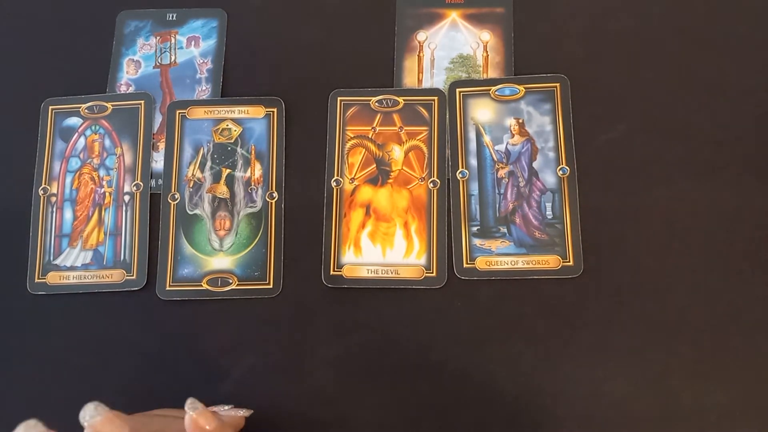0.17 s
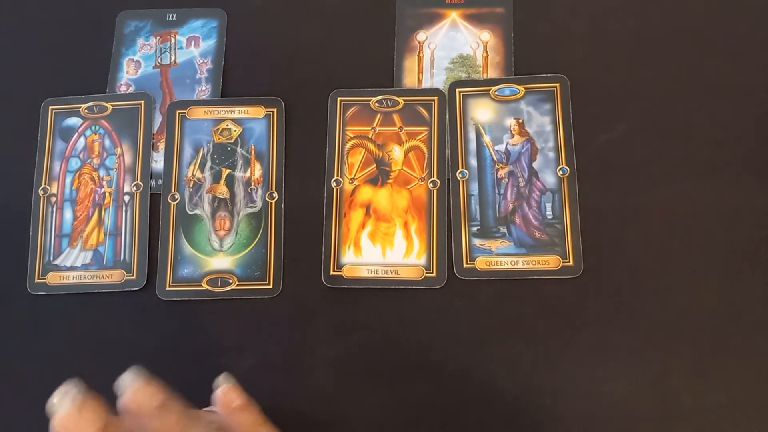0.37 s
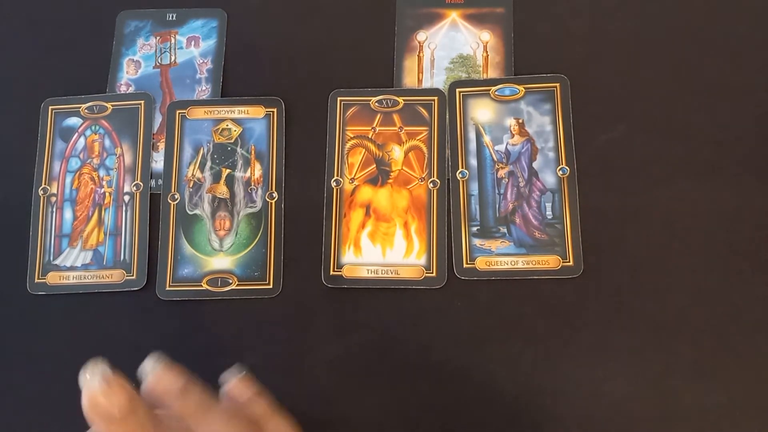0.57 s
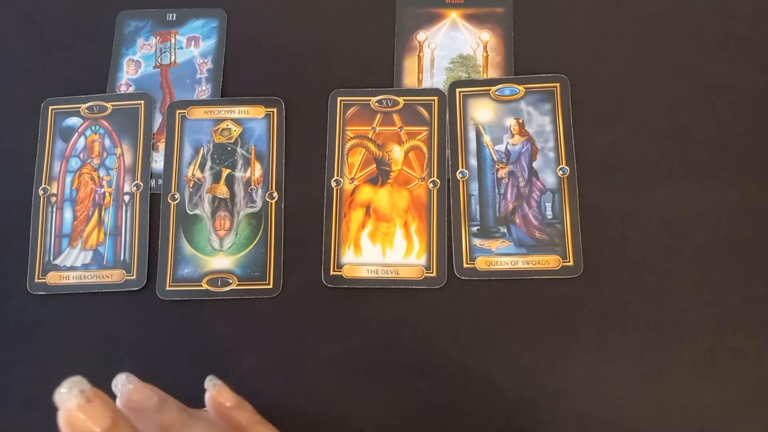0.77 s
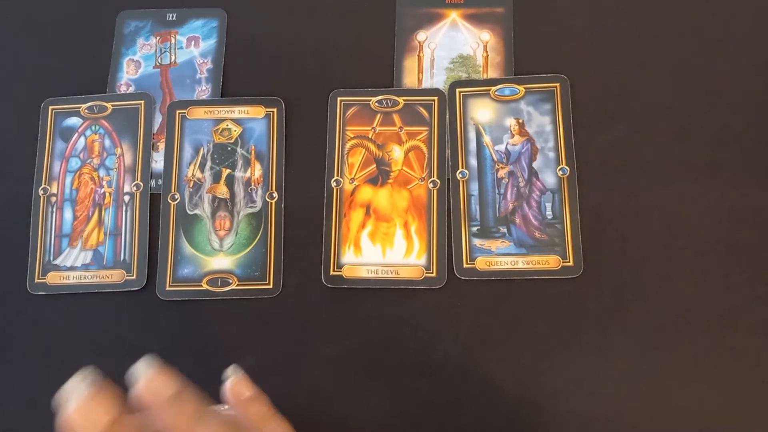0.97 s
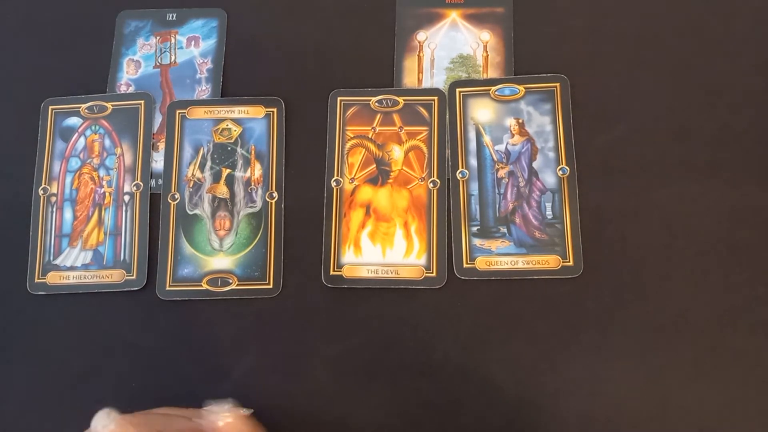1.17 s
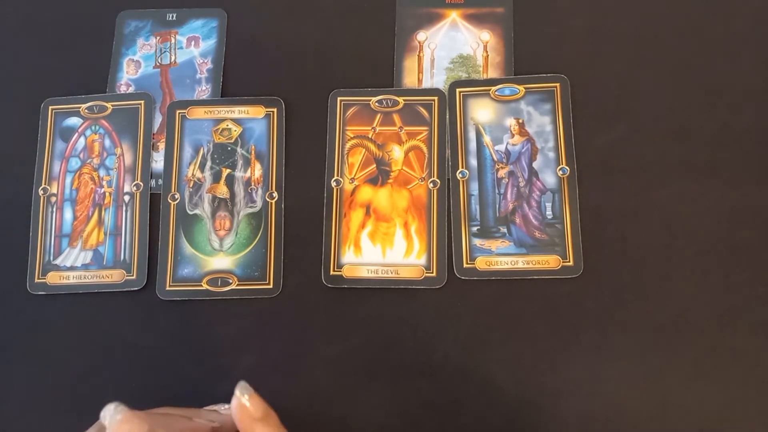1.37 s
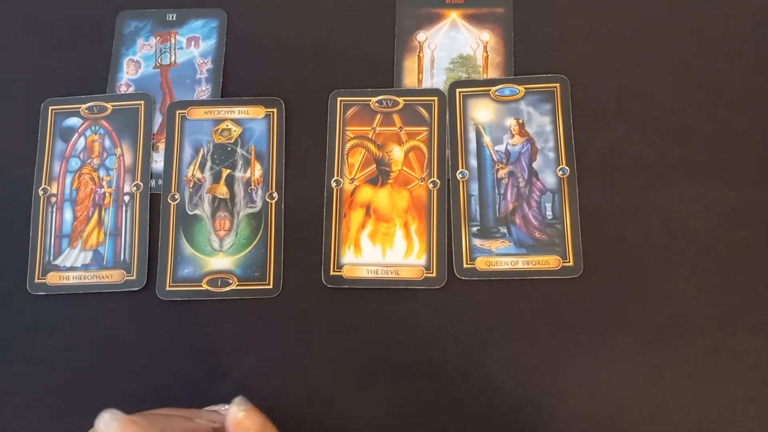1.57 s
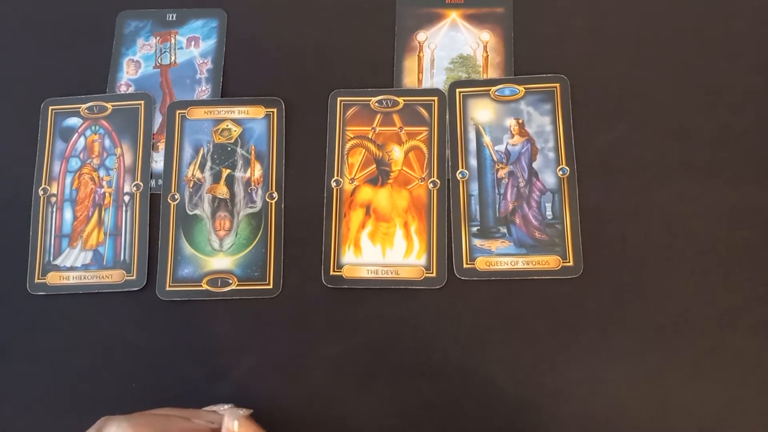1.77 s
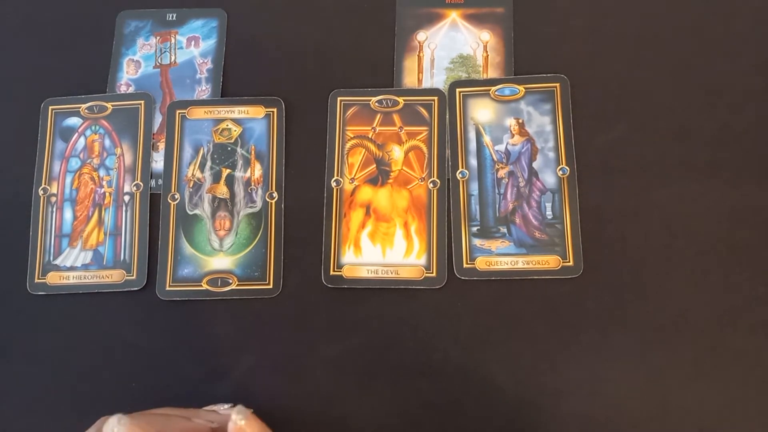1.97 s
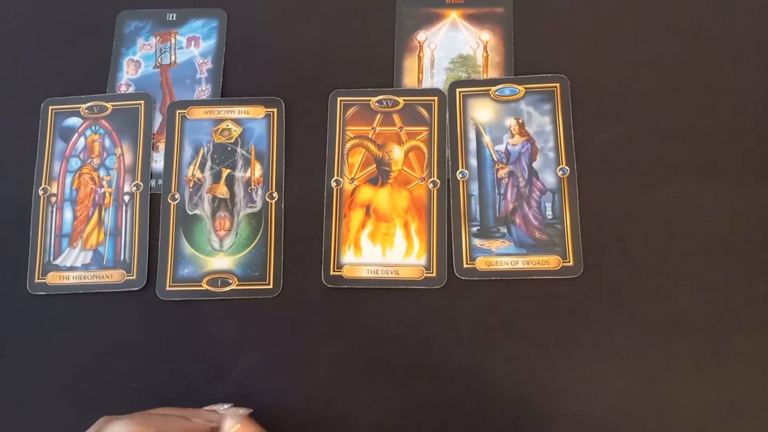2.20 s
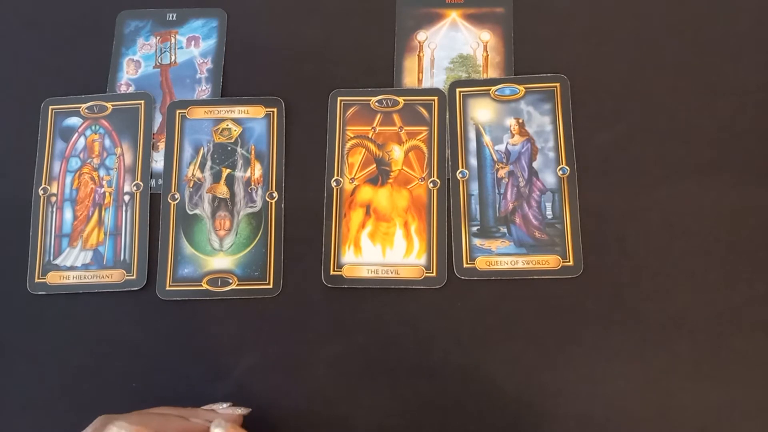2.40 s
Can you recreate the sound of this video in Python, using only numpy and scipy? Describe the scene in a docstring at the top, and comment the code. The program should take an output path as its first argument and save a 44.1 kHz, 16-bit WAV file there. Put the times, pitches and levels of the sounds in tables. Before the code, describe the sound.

Fingertips tap softly on a table, each a dull knock with a brief low boom, a faint nail tick and a short room echo. Five taps fall about 0.3 seconds apart until 1.2 seconds, then seven quicker, uneven ones follow until 2.4 seconds. The hand bumps lightly near 0.4, 1.4 and 2 seconds. Underneath, a faint hiss and soft rush grow slightly over quiet room tone.

```python
"""Fingertips tap softly and unevenly on a table in a small quiet room. Each finger pad lands with a dull knock
and sets off a brief low boom; the nail adds a faint, grazing tick, and the room answers with a short tail. The
hand bumps down lightly between taps. Underneath, a soft rush swells over the room tone and a faint hiss rises
and eases."""
import sys
import numpy as np
from scipy import signal
from scipy.fft import rfft, irfft
from scipy.io import wavfile

SR = 44100
rng = np.random.default_rng(int(sys.argv[2]) if len(sys.argv) > 2 else 0)


def dump(signal):
    """Clip the signal to [-1, 1] and save it as 16-bit WAV at the path in sys.argv[1]."""
    limited = np.clip(np.atleast_2d(signal).T, -1, 1)
    pcm = np.round(limited * 32767).astype(np.int16)
    wavfile.write(sys.argv[1], SR, pcm)


N = 107515

# Finger taps: t/s, thump level/dB, boom trim/dB, upper-mode and knock trim/dB, ring time factor,
# tick level/dB, nail resonance f/Hz, its boost/dB, tick tilt/(dB per octave)
TAP_CUES = [(0.0135, -3, -1.5, -0.5, 0.72, -2, 3600, 3, 1.9),
            (0.3144, -0.5, -1.5, 0, 0.71, -2.5, 3900, 7.1, 0.52),
            (0.6197, 0, -1.5, 0, 0.84, 0, 4850, 7.7, 2.9),
            (0.926, -1.5, 2.5, 1.5, 0.56, -2.5, 4100, 8.3, 1.4),
            (1.2395, 1.5, -1.5, 1.5, 0.83, -2.5, 6950, 5.9, -0.72),
            (1.4288, -1, -3, -5.5, 0.92, -1, 6600, 5.1, 0.14),
            (1.6201, -7.5, -1.5, -3, 1.08, -11.5, 7400, 4.2, 1.5),
            (1.7792, -0.5, -5.5, -0.5, 0.36, -0.5, 6940, 3, 0.54),
            (1.9145, -5, -3.5, -4, 0.82, -13.5, 7300, 2.7, -0.64),
            (2.1041, -4.5, -2, -1, 0.95, -2, 4400, 4.6, 1.5),
            (2.266, -7.5, -9.5, -9, 0.9, -12.5, 8360, 1.8, 0.29),
            (2.4111, -1, -2, -5.5, 1.1, -8, 4360, 8, 1.7)]
# Low modes that ring after each tap: f/Hz, level/dB, attack/s, hold/s, t60/s
LOW_MODES = [(69.95, -36.5, 0.032, 0.04, 0.19), (140.7, -32.5, 0.011, .003, 0.056),
             (124.1, -50.5, 0.05, 0.035, 0.35), (160.3, -37, .011, 0.0026, 0.07),
             (178.8, -42.5, 0.013, .004, 0.4), (197.2, -46.5, 0.039, 0.0047, .2),
             (221.3, -50.5, .025, 0.0089, .2), (257.1, -45.5, 0.019, 0.027, 0.23),
             (284.8, -49.5, 0.011, 0.0079, 0.26), (334.4, -47, .022, 0.044, 0.18),
             (397, -51, 0.0021, .004, 0.22)]
# Dull colour of the finger pad's knock: f/Hz, level/dB
PAD_EQ = [(30, -56), (100, -9), (200, 11.5), (380, -5), (520, -9.5), (700, -19), (1300, -26), (2200, -44.5),
          (4000, -56), (16000, -76.5)]
# Bright colour of the nail's tick: f/Hz, level/dB
NAIL_EQ = [(100, -27), (600, -18.5), (1400, -2), (2200, -6), (3100, -9), (5500, -8.5), (7000, -3),
           (8300, -4.5), (9900, -11), (11400, -7), (13500, -8), (16000, -11.5)]
# Stereo lean of the tick: f/Hz, left minus right level/dB
NAIL_LEAN = [(2000, -5), (5500, -0.5), (8500, 14), (11000, 5), (15000, 3)]
# Decay of the room: f/Hz, t60/s
ROOM_DECAY = [(60, 0.59), (150, 0.48), (350, 0.64), (700, 1), (2000, 0.61), (5000, 0.38), (15000, 0.21)]
# Left-right likeness of diffuse sound: f/Hz, correlation (0-1)
STEREO_LIKENESS = [(50, 0.69), (300, 0.84), (600, 0.38), (1200, 0), (16000, 0)]
# Soft bumps of the hand: t/s, level/dB, f/Hz, length/s
BUMP_CUES = [(0.189, -53, 89, 0.085), (0.364, -40.5, 77.3, .11), (1.355, -46, 91.3, 0.11),
             (1.963, -39.5, 73.4, 0.074), (2.177, -37, 85.2, 0.093), (2.281, -50, 114, 0.079)]
# Colours of the room tone, the hiss and the rush: f/Hz, relative level/dB
ROOM_TONE_EQ = [(20, -7.5), (40, -31), (65, -3.5), (100, 3), (150, -4), (250, -16), (340, -9.5),
                (520, -29.5), (800, -32.5), (1300, -47.5), (2400, -35), (3300, -47.5), (7000, -47.5),
                (16000, -45.5)]
HISS_EQ = [(500, 6.5), (1000, 7.5), (2400, 4), (3300, -2.5), (5500, -5), (6500, 0.5), (7600, 0.5),
           (9000, -14.5), (16000, -4.5)]
RUSH_EQ = [(100, -24.5), (300, 11.5), (550, 4.5), (1150, 1), (1450, -15.5), (2500, -58.5), (5000, -38)]
# Fader rides of the hiss and the rush: t/s, level/dB
HISS_RIDE = [(0, -83), (.7, -80.5), (1.1, -77.5), (1.45, -73.5), (1.75, -74.5), (2.05, -74), (2.4, -77)]
RUSH_RIDE = [(0, -94), (.9, -81), (1.4, -73.5), (1.9, -65.5), (2.15, -65.5), (2.4, -59.5)]


def amp(db):
    """Decibels to gain."""
    return 10 ** (np.asarray(db) / 20)


def curve_at(points, hz):
    """Reads a curve on a log-frequency axis."""
    f, value = np.transpose(points)
    return np.interp(np.log(hz + 1), np.log(f + 1), value)


def add(mix, start_s, sound):
    """Lays a sound into the mix."""
    part = mix[..., round(start_s * SR):][..., :sound.shape[-1]]
    part += sound[..., :part.shape[-1]]


def fade(t, t60):
    """Exponential decay, 60 dB down at t60."""
    return np.exp(-np.log(1000) * t / t60)


def diffuse(spectra, hz):
    """Blends two unrelated spectra: narrow in the bass, wide in the treble."""
    likeness = curve_at(STEREO_LIKENESS, hz)
    left, other = spectra
    return np.array([left, likeness * left + np.sqrt(1 - likeness ** 2) * other])


def pulse(colour_db):
    """The tightest (minimum-phase) click with the given dB per frequency bin."""
    mirrored_db = np.r_[colour_db, colour_db[-2:0:-1]]
    log_gain = np.log(amp(np.clip(mirrored_db, -100, 40)))
    return np.fft.ifft(np.exp(np.conj(signal.hilbert(log_gain)))).real


def from_right(x, lean_db=3, lag_s=0.00027):
    """Places a sound to the right: it reaches the left later and weaker."""
    at = np.arange(len(x))
    delayed = np.interp(at - lag_s * SR, at, x)
    return np.array([amp(-lean_db / 2) * delayed, amp(lean_db / 2) * x])


def pad_knock(gain_db=-11, size=4096):
    """The soft pad lands: one dull pulse."""
    return amp(gain_db) * pulse(curve_at(PAD_EQ, np.fft.rfftfreq(size, 1 / SR)))


def low_thump(boom_db, upper_db, ring, scatter_db=1.23, detune=0.004):
    """The low modes swell, hold and die; no two taps strike quite the same spot."""
    t, out = np.arange(SR // 2) / SR, 0
    for hz, db, attack, hold, t60 in LOW_MODES:
        level_draw, pitch_draw = rng.standard_normal(2)
        swell = np.sin(np.pi / 2 * np.minimum(t / attack, 1)) ** 2
        decay = fade(np.maximum(t - attack - hold, 0), t60 * np.clip(ring, 0.5, 2))
        trim_db = boom_db * (hz < 100) + upper_db * (hz > 220)
        gain = amp(db + trim_db + scatter_db * level_draw)
        tone = np.sin(2 * np.pi * hz * (1 + detune * pitch_draw) * t)
        out = out - gain * swell * decay * tone
    return out


def nail_tick(peak_hz, peak_db, tilt_db, gain_db=-34.5, width_oct=0.2, size=1024):
    """The nail's click with one broad resonance; its high treble leans left."""
    hz = np.fft.rfftfreq(size, 1 / SR)
    octaves = np.log2((hz + 1) / peak_hz)
    resonance = peak_db * np.exp(-(octaves / width_oct) ** 2)
    colour = curve_at(NAIL_EQ, hz) + resonance + tilt_db * np.maximum(octaves, -2)
    lean = curve_at(NAIL_LEAN, hz) / 2
    return amp(gain_db) * np.array([pulse(colour + lean), pulse(colour - lean)])


def nail_graze(tick, grain_db=3.5, t60=0.023):
    """The nail grazes the surface as it lands: the tick plus a few milliseconds of grain."""
    t = np.arange(SR // 20) / SR
    grain = rng.standard_normal((2, len(t))) * fade(t, t60)
    grain *= amp(grain_db) / np.linalg.norm(grain[0])
    return signal.fftconvolve(tick, grain + signal.unit_impulse(len(t)), axes=1)


def room_reverb(send):
    """The room's diffuse tail, hanging longest in the mids."""
    hz, t, spectra = signal.stft(rng.standard_normal((2, SR // 2)), SR, nperseg=256)
    decay = fade(t, curve_at(ROOM_DECAY, hz)[:, None])
    _, tail = signal.istft(diffuse(spectra, hz[:, None]) * decay, SR, nperseg=256)
    return signal.fftconvolve(send, tail / np.linalg.norm(tail[0]), axes=1)


def finger_taps(thump_send_db=-13.5, knock_send_db=4.5, tick_send_db=7, nail_lag_s=0.00086):
    """Every tap layers a knock, a thump and a tick, each with its own reverb send."""
    out = np.zeros((2, N))
    pad = from_right(pad_knock())
    for start_s, thump_db, boom_db, upper_db, ring, tick_db, peak_hz, peak_db, tilt_db in TAP_CUES:
        knock = amp(thump_db + upper_db) * pad
        thump = amp(thump_db) * from_right(low_thump(boom_db, upper_db, ring))
        tick = amp(tick_db) * nail_tick(peak_hz, peak_db, tilt_db)
        send = amp(thump_send_db) * thump
        add(send, 0, amp(knock_send_db) * knock)
        add(send, 0, amp(tick_send_db) * tick.mean(0))
        for layer in (knock, thump, room_reverb(send)):
            add(out, start_s, layer)
        add(out, start_s + nail_lag_s, nail_graze(tick))
    return out


def noise_bed(eq):
    """Steady, diffuse noise at unit rms, coloured by an EQ curve."""
    hz = np.fft.rfftfreq(N, 1 / SR)
    white = rfft(rng.standard_normal((2, N)))
    bed = irfft(diffuse(white, hz) * amp(curve_at(eq, hz)), N)
    return bed / bed.std()


def ambience(room_tone_db=-60.5):
    """Steady room tone, a soft rush that grows, and a faint hiss that rises and eases."""
    t = np.arange(N) / SR
    rush = amp(np.interp(t, *np.transpose(RUSH_RIDE))) * noise_bed(RUSH_EQ)
    hiss = amp(np.interp(t, *np.transpose(HISS_RIDE))) * noise_bed(HISS_EQ)
    return amp(room_tone_db) * noise_bed(ROOM_TONE_EQ) + rush + hiss


def hand_bumps():
    """The flesh of the hand pushes the table: a low swell without a click."""
    out = np.zeros(N)
    for start_s, db, hz, length in BUMP_CUES:
        t = np.arange(0, length, 1 / SR)
        swell = np.sin(np.pi * t / length) ** 2
        add(out, start_s, amp(db) * swell * np.sin(2 * np.pi * hz * t))
    return from_right(out)


def scene():
    """Taps and bumps over the quiet room."""
    return finger_taps() + hand_bumps() + ambience()


def record(dry, cutoff_hz=16000):
    """A steep high cut on the whole mix."""
    lowpass = signal.firwin(511, cutoff_hz, window=("kaiser", 9), fs=SR)
    return signal.oaconvolve(dry, lowpass[None], "same")


dry = scene()
out = record(dry)
dump(out)
```